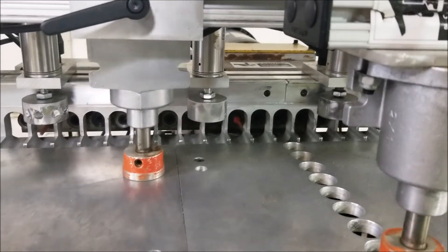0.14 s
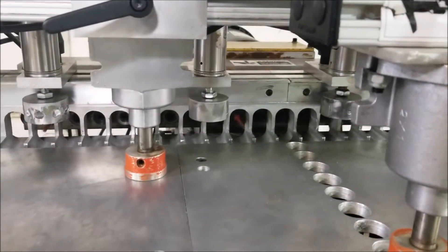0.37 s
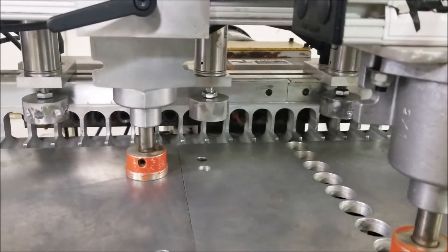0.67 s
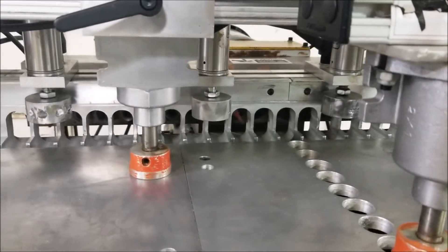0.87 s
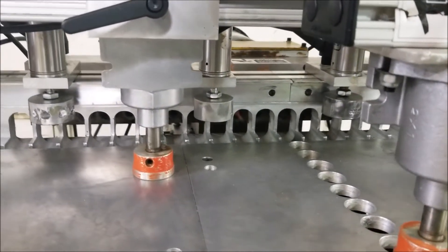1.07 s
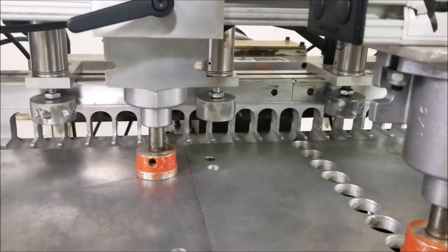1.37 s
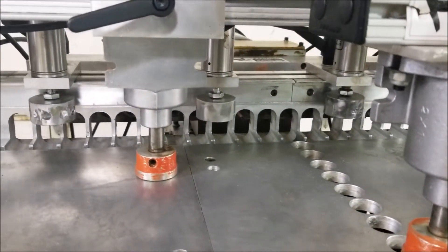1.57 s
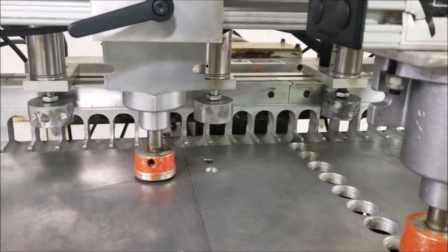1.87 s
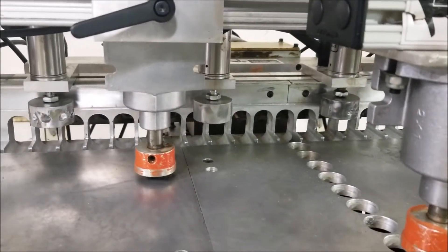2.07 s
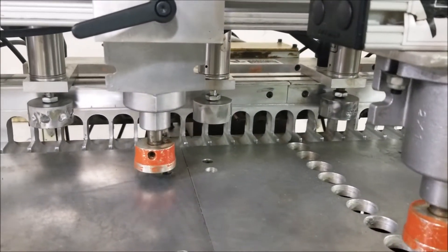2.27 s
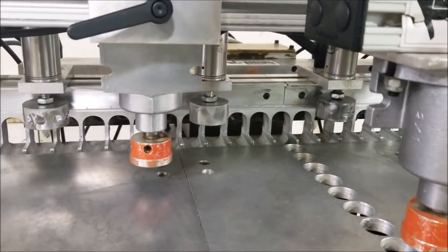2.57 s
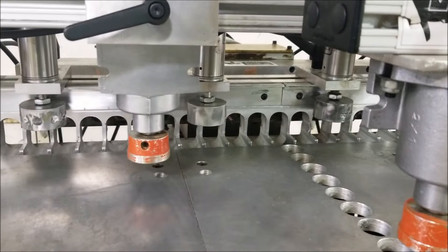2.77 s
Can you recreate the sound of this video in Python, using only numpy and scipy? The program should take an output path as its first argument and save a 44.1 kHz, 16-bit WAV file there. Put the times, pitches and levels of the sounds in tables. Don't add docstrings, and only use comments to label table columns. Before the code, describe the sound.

Loud drilling machine roar with air hiss cuts out, leaving motor hum, puffs and metallic clacks

```python
import sys
import numpy as np
from scipy import signal
from scipy.fft import rfft, irfft
from scipy.io import wavfile
from scipy.ndimage import uniform_filter1d

SR = 44100
rng = np.random.default_rng(int(sys.argv[2]) if len(sys.argv) > 2 else 0)


def how_loud(loudness_db):
    steps = np.asarray(loudness_db, float) / 20
    return 10 ** steps


def dump(signal):
    limited = np.clip(np.atleast_2d(signal).T, -1, 1)
    pcm = np.round(limited * 32767).astype(np.int16)
    wavfile.write(sys.argv[1], SR, pcm)


N = 129654

TURN_HZ, FLUTES = 29.72, 3
FLUTE_HZ = TURN_HZ * FLUTES
# time_s, roar_db, flute_thump_db
CUTTING_LOAD = [(0, -32, -54), (.1, -31, -40), (.3, -31.5, -36), (.63, -29.5, -32), (.95, -28.5, -32.5),
                (1.2, -28.5, -33.5), (1.3, -29, -37), (1.42, -33.5, -49), (1.52, -39, -53),
                (1.62, -45, -50), (1.8, -61, -70), (2.94, -77, -69)]
# pitch_hz, density_db_per_hz
ROAR_LOW = [(25, -17), (60, -8), (110, -7), (227, -7.5), (378, -8.5), (507, -3.5), (769, 0.5), (1000, -10)]
ROAR_HIGH = [(590, -113), (1000, -3), (1710, 2), (2810, -8), (3500, -8), (7700, -20), (8550, -18.5),
             (13100, -26), (16000, -29)]
ROAR_HIGH_DB, FLUTE_DEPTH = -0.5, 0.028
# multiple_of_turn, level_db
GEAR_TONES = [(6, -15.5), (10, -14), (12, -14.5), (13, -10), (15, -11.5), (16, -16.5), (18, -15.5),
              (21, -10), (24, -8.5), (26, -11.5), (29, -7.5), (36, -10), (48, -13.5), (63, -12.5),
              (106, -34)]
GEAR_WOBBLE_DB, GEAR_WOBBLE_HZ = 2.5, 9
# time_s, housing_resonance_db, gear_tones_db
BITE = [(0, -18, -2.5), (.15, -9, -4.5), (.35, -2, 0), (.5, -3.5, 1), (.65, -2, 1), (.78, -14, -2.5),
        (.93, -3.5, -1), (1.05, -8, -2.5), (1.22, -4, 4.5), (1.32, -14, 0.5), (1.45, -31, 3),
        (1.6, -5, -14), (2.94, -12, -13)]
HOUSING_HZ, HOUSING_T60_S = 755, 0.023
# start_s, peak_db
LOUD_CHIRPS = [(0.114, -34), (0.1672, -38), (0.1946, -34), (0.26, -27), (0.3158, -31), (0.4176, -39),
               (0.4505, -31), (0.5094, -33), (0.5648, -36), (0.5867, -27), (0.6182, -38), (0.6531, -37),
               (0.7199, -36), (0.7543, -34), (0.8012, -38), (0.8348, -32), (0.8551, -34), (0.8895, -33),
               (0.9225, -34), (0.9544, -40), (0.9684, -34), (0.9878, -39), (1.015, -39), (1.0237, -35),
               (1.0357, -37), (1.0557, -39), (1.0691, -41), (1.1011, -36), (1.1559, -34), (1.1704, -24.5),
               (1.2243, -38), (1.2377, -31), (1.2592, -30), (1.2941, -35), (1.35, -37), (1.3969, -36),
               (1.4188, -28), (1.4582, -39)]
EDGE_DB = [1.5, -.5, -1.5]
CHIRP_HZ, CHIRP_T60_S, CHIRP_DB, CHIRP_SPREAD_DB = 13350, 0.0066, -8.5, 2
WHINE_DB, CHIRPS_END_S = -60, 1.47

# pitch_hz, density_db_per_hz
SHUDDER = [(30, -4), (55, -2), (120, -6), (220, -12), (300, -3), (400, -34)]
SHUDDER_S, SHUDDER_RISE_S, SHUDDER_T60_S, SHUDDER_DB = 1.303, 0.099, 0.99, -31.5

# start_s, peak_db, pitch_hz, left_right_db, thud_db
KNOCKS = [
    (2.249, -34, 1300, -2, 0),
    (2.354, -33, 1440, -7, -4),
    (2.388, -34, 1800, -10, -8),
    (2.406, -34, 1300, -5, -6),
    (2.4555, -21.5, 1290, -5, -24),
    (2.562, -36, 1700, -1.5, -4),
    (2.7307, -23, 1420, 4, -18),
    (2.737, -33, 1500, 4, 7),
    (2.745, -38, 1700, 4, -6),
]
KNOCK_T60_S, THUD_HZ, RATTLE_DB, RATTLE_S = .0055, 540, -37, .012

# time_s, level_db
AIR_FLOW = [(0, -24), (.04, -26.5), (.09, -29), (.17, -33), (.3, -34), (.7, -38), (1.22, -43.5),
            (1.262, -32.5), (1.3, -38.5), (1.45, -51), (1.6, -44.5), (1.7, -48.5), (1.8, -52.5),
            (1.95, -61), (2.925, -74), (2.94, -57)]
# pitch_hz, density_db_per_hz
JET = [(900, -14), (1500, -19.5), (2430, -9), (3010, -17), (3800, -14), (5000, -18), (7170, -22),
       (13000, -24), (16000, -26)]
# time_s, level_db
PUFF = [(0, -37), (.05, -38), (.12, -44), (.25, -61), (.5, -68), (1.3, -60), (1.45, -45.5), (1.65, -52),
        (1.78, -62), (1.9, -75), (2.24, -90), (2.252, -55), (2.3, -49), (2.38, -46.5), (2.41, -48),
        (2.44, -52), (2.52, -90), (2.94, -92)]
# pitch_hz, density_db_per_hz
PUFF_AIR = [(1760, -19), (3000, -3), (4080, -7), (4600, -7), (9400, -11.5), (12700, -6.5), (16000, -3)]
# start_s, peak_db, t60_s
TICKS = [
    (1.929, -50, 0.02),
    (2.2485, -33, 0.016),
    (2.3885, -44, 0.02),
]

# time_s, level_db
IDLE = [(0, -42), (1.4, -40.5), (1.6, -41.5), (1.67, -39), (1.81, -39), (1.93, -36.5), (2.03, -41),
        (2.15, -38.5), (2.29, -37.5), (2.4, -31.5), (2.42, -53), (2.45, -35.5), (2.74, -34.5), (2.83, -38),
        (2.94, -33)]
IDLE_HZ = 355
# pitch_hz, level_db, wander_hz, left_right_db
HUMS = [(279.5, -50, 8, 0), (646, -58, 6, 0), (721, -57, 6, 0)]
# time_s, level_db
FAN_LOAD = [(0, -4), (.5, 8), (1.3, -5), (1.6, -9.5), (1.7, -1), (2.05, -1.5), (2.22, 6), (2.35, -3),
            (2.7, -1), (2.94, -1.5)]
FAN_HZ, FAN_DB = 140.1, -44.5
# pitch_hz, density_db_per_hz
SHOP_LOW = [(15, -48), (25, -5.5), (135, -9.5), (214, -9), (267, -6), (308, -7.5), (354, -5), (430, -15.5),
            (700, -16), (910, -64), (1540, -120)]
SHOP_HIGH = [(410, -18), (700, -20.5), (757, -6.5), (1500, -6.5), (2840, -12.5), (4260, -14.5), (9350, -30),
             (14800, -33.5), (16000, -26)]
SHOP_LOW_DB, SHOP_HIGH_DB = -38, -46.5
# time_s, level_db
SWELL = [(0, -8), (1.9, -0.5), (2.15, -1), (2.35, 1.5), (2.94, 1)]

# pitch_hz, likeness_0_to_1
LIKENESS = [(30, .86), (80, .98), (300, .93), (700, .8), (1650, .05), (15000, .05)]
# pitch_hz, left_right_db
TILT = [(60, 1.5), (130, 0), (290, -2), (640, -4.5), (1410, 1), (3100, 4.5), (6820, -11), (15000, -9.5)]
# pitch_hz, half_width_hz, left_db, right_db
CHANNEL_DIPS = [(3650, 250, 3, 2), (5500, 450, -3, -4), (8100, 850, -30, -1), (8750, 400, -20, -5),
                (9850, 200, 2, 3), (14200, 350, -10, -4), (15200, 750, -11, -1)]
LEFT_LAG_S, RUMBLE_CUT_HZ, TOP_HZ = .00017, 38, 15760
MASK_DB, MASK_FROM_HZ = -11, 4500
SPEED_WANDER = .0009


def rms_one(x):
    return x / np.sqrt(np.mean(x ** 2) + 1e-20)


def in_time(rows):
    s, *columns = np.transpose(rows)
    return [np.interp(np.arange(N) / SR, s, c) for c in columns]


def at_hz(points, hz):
    table_hz, values = np.array(points).T
    return np.interp(np.log(hz), np.log(table_hz), values)


def drift(rate_hz):
    r = np.exp(-80 * np.pi * rate_hz / SR)
    slow = signal.lfilter([1], [1, -2 * r, r * r], rng.standard_normal(N // 40 + 2002))[2000:]
    return np.interp(np.arange(N) / 40, np.arange(len(slow)), rms_one(slow - slow.mean()))


def ring(clicks, hz, t60):
    r, w = how_loud(-60 / (t60 * SR)), 2 * np.pi * hz / SR
    return signal.lfilter([0, np.sin(w)], [1, -2 * r * np.cos(w), r * r], clicks + 1e-18)


def sides(db):
    return how_loud(np.array([[db / 2], [-db / 2]]))


def noise(spectrum, patchy_db):
    hz = np.maximum(np.fft.rfftfreq(N, 1 / SR), 1)
    low_hz, high_hz = spectrum[0][0], spectrum[-1][0]
    inside = (hz > low_hz) & (hz <= high_hz)
    alike = np.clip(at_hz(LIKENESS, hz), 0, 1)
    mid, side = rfft(rng.standard_normal((2, N)))
    pair = np.sqrt(1 + alike) * mid + np.sqrt(1 - alike) * side * [[1], [-1]]
    pair = pair * sides(at_hz(TILT, hz))[:, 0] * inside * how_loud(at_hz(spectrum, hz))
    place = np.log(hz / low_hz) / np.log(high_hz / low_hz) * 4
    together = drift(4.5)
    out = np.zeros((2, N))
    for k in range(5):
        band = irfft(pair * np.clip(1 - abs(place - k), 0, 1), N)
        out += band * how_loud(patchy_db * (0.47 * together + drift(16.4)))
    return out / np.sqrt(np.mean(out.mean(0) ** 2))


def tone(hz, db, wobble_db, wobble_hz):
    phase = 2 * np.pi * (hz * np.arange(N) / SR + rng.random())
    phase = phase + (0.09 + SPEED_WANDER * hz) * drift(wobble_hz)
    apart = np.arccos(np.clip(at_hz(LIKENESS, hz), 0, 1)) * np.tanh(drift(2.27))
    level = np.sqrt(2) * how_loud(db + wobble_db * drift(wobble_hz))
    return level * np.sin(phase + apart * [[1], [-1]]) * sides(at_hz(TILT, hz))


def housing_and_gears():
    throb = 1 + FLUTE_DEPTH * np.cos(2 * np.pi * FLUTE_HZ * np.arange(N) / SR)
    roar = noise(ROAR_LOW, patchy_db=2.5) + how_loud(ROAR_HIGH_DB) * throb * noise(ROAR_HIGH, patchy_db=1.0)
    resonance_db, tones_db = in_time(BITE)
    resonance = rms_one(ring(noise(ROAR_LOW, patchy_db=1.5), HOUSING_HZ, HOUSING_T60_S))
    gears = sum(tone(k * TURN_HZ, db, GEAR_WOBBLE_DB, GEAR_WOBBLE_HZ) for k, db in GEAR_TONES)
    return roar + how_loud(resonance_db) * resonance + how_loud(tones_db) * gears


def edge_chirps(roar_db, thump_db):
    count = int(N / SR * FLUTE_HZ) - 1
    turns = np.arange(count) + .5 + 0.15 * rng.standard_normal(count)
    at = (turns * SR / FLUTE_HZ).astype(int)
    bites = np.zeros(N)
    spread_db = CHIRP_SPREAD_DB * rng.standard_normal(count)
    bites[at] = how_loud(CHIRP_DB + thump_db[at] + np.resize(EDGE_DB, count) + spread_db)
    bites += how_loud(WHINE_DB + roar_db)
    bites[int(CHIRPS_END_S * SR):] = 0
    for s, db in LOUD_CHIRPS:
        bites[int(s * SR)] = how_loud(db + 0.3)
    scrape = signal.lfilter([1], [1, -.985], bites) * rng.standard_normal((2, N))
    chirp = ring(ring(scrape, CHIRP_HZ, CHIRP_T60_S), CHIRP_HZ - 100, CHIRP_T60_S)
    return how_loud(-8) * chirp * sides(-7.0) / 20


def cutter():
    roar_db, thump_db = in_time(CUTTING_LOAD)
    thump = tone(FLUTE_HZ, thump_db, wobble_db=-1.5, wobble_hz=1.0)
    return how_loud(roar_db) * housing_and_gears() + thump + edge_chirps(roar_db, thump_db)


def shudder():
    t = np.arange(N) / SR - SHUDDER_S
    shape_db = np.where(t < 0, 20 * t / SHUDDER_RISE_S, -60 * t / SHUDDER_T60_S)
    return how_loud(SHUDDER_DB + shape_db) * noise(SHUDDER, patchy_db=6.5)


def clamps():
    out = np.zeros((2, N))
    fade = np.exp(-np.arange(1500) / (RATTLE_S * SR))
    for s, db, hz, pan_db, thud_db in KNOCKS:
        start = int(s * SR)
        click = np.zeros(N)
        click[start] = -how_loud(db)
        click[start + 150:start + 1650] = how_loud(db + RATTLE_DB) * rng.standard_normal(1500) * fade
        note = ring(ring(click, hz, KNOCK_T60_S), hz, KNOCK_T60_S) / 6
        out += sides(pan_db) * (note + how_loud(thud_db) * ring(click, THUD_HZ, 0.02))
    return out


def valves():
    t = np.arange(N) / SR
    bursts = sum(how_loud(db - 60 * np.abs(t - s) / t60) * (t >= s) for s, db, t60 in TICKS)
    leak = how_loud(in_time(AIR_FLOW)[0]) * noise(JET, patchy_db=1.5)
    return leak + (how_loud(in_time(PUFF)[0]) + bursts) * noise(PUFF_AIR, patchy_db=3.0)


def shop():
    hums = sum(tone(hz, db, 0.88, wander_hz) * sides(pan_db) for hz, db, wander_hz, pan_db in HUMS)
    hums = hums + tone(FAN_HZ, FAN_DB + in_time(FAN_LOAD)[0], 2.3, 17.0)
    motor = tone(IDLE_HZ, in_time(IDLE)[0], .8, 8) * sides(-3)
    bed = how_loud(SHOP_LOW_DB) * noise(SHOP_LOW, patchy_db=1.3)
    bed = bed + how_loud(SHOP_HIGH_DB) * noise(SHOP_HIGH, patchy_db=0.94)
    return how_loud(in_time(SWELL)[0]) * (hums + bed) + motor


def scene():
    return cutter() + shudder() + shop() + valves() + clamps()


def colour_channels(x):
    hz = np.fft.rfftfreq(N, 1 / SR)
    colour_db = np.zeros((2, len(hz)))
    for at, width, left_db, right_db in CHANNEL_DIPS:
        colour_db += np.outer([left_db, right_db], np.exp(-((hz - at) / width) ** 4))
    limits = (hz < TOP_HZ) / np.sqrt(1 + (RUMBLE_CUT_HZ / np.maximum(hz, 1)) ** 8)
    lag = np.exp(-2j * np.pi * np.outer([LEFT_LAG_S, 0], hz))
    return irfft(rfft(x) * how_loud(colour_db) * limits * lag, N)


def drop_masked(x):
    hz, _, cells = signal.stft(x, SR, nperseg=1024)
    power = uniform_filter1d(abs(cells) ** 2, size=5, axis=1)
    mask = uniform_filter1d(power.max(0), size=60, axis=0)
    mask = uniform_filter1d(mask, size=5, axis=1)
    keep = (power > mask * how_loud(2 * MASK_DB)) | (hz < MASK_FROM_HZ)[:, None]
    return signal.istft(cells * keep, SR, nperseg=1024)[1][:, :N]


def band_limit(x):
    return signal.sosfilt(signal.butter(12, 16310, fs=SR, output="sos"), x)


def record(dry):
    mix = drop_masked(colour_channels(dry))
    return band_limit(mix)


dry = scene()
out = record(dry)
dump(out)
```